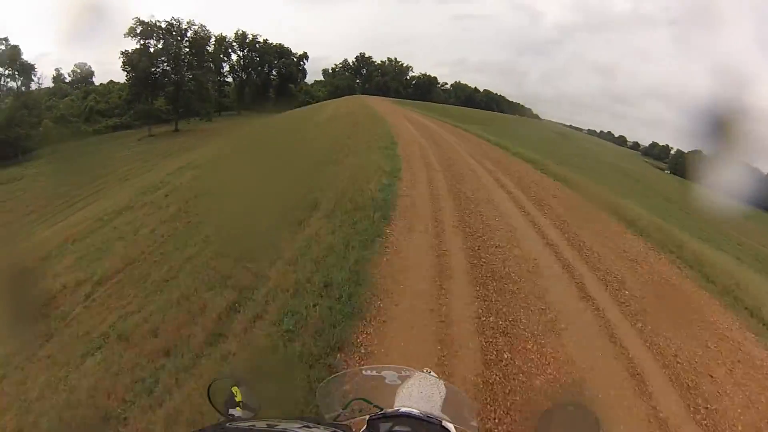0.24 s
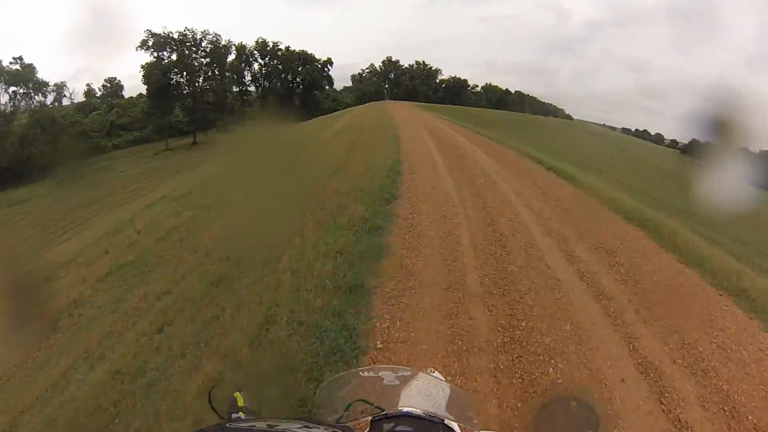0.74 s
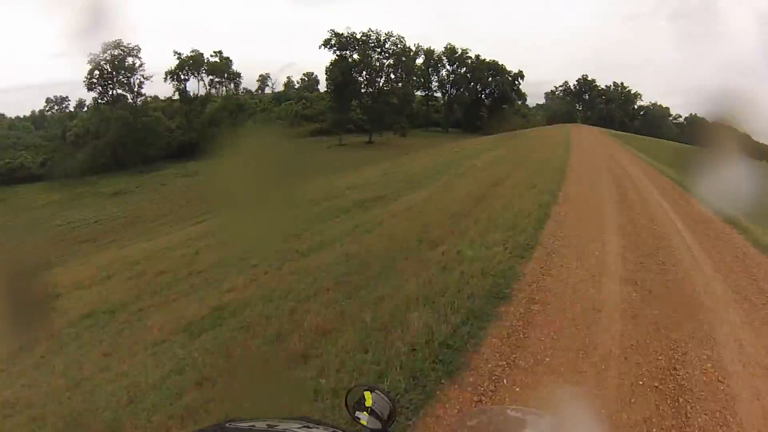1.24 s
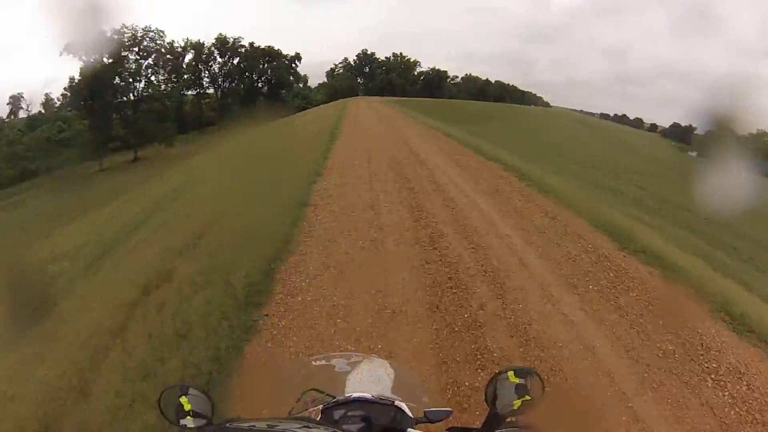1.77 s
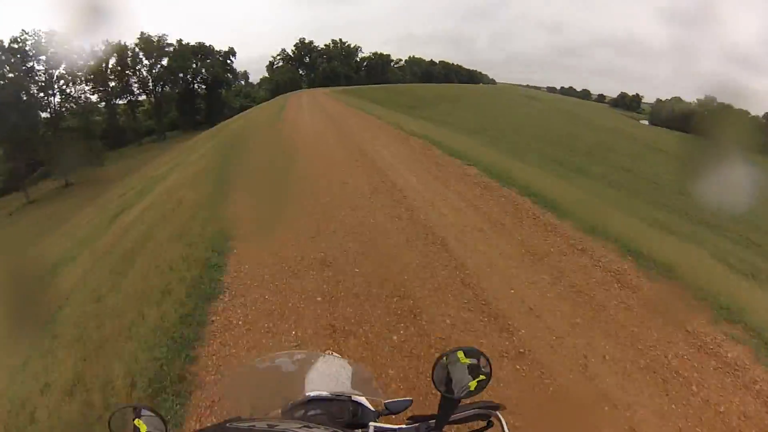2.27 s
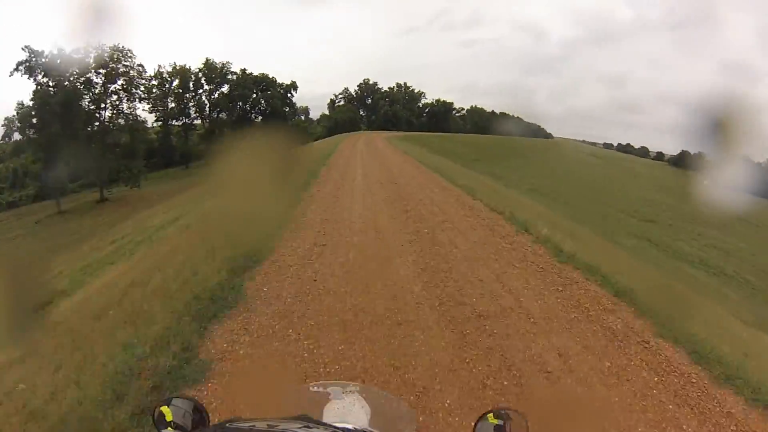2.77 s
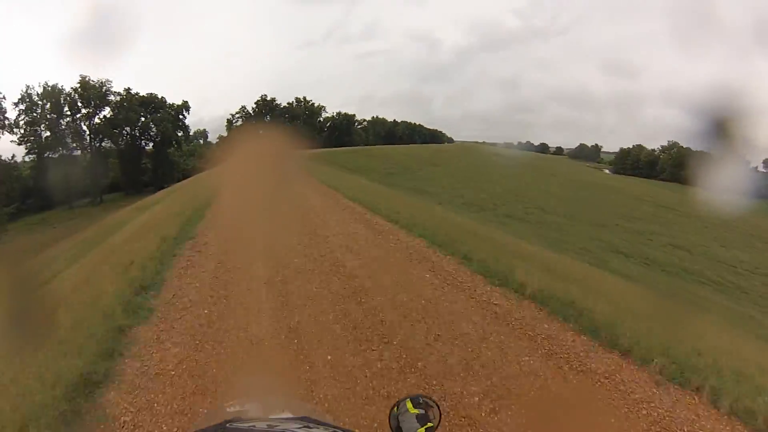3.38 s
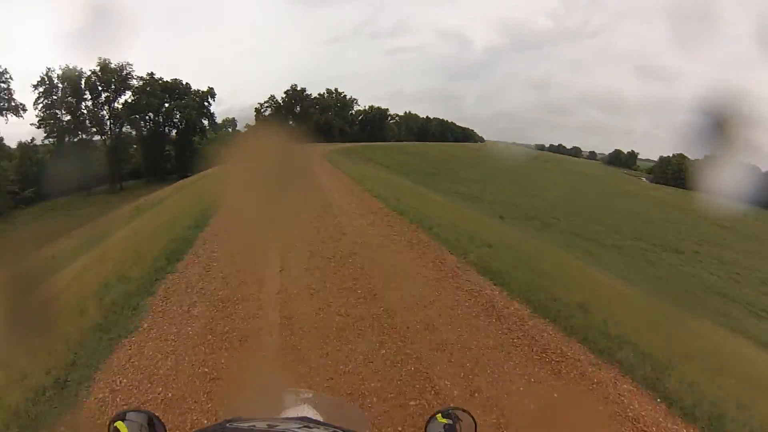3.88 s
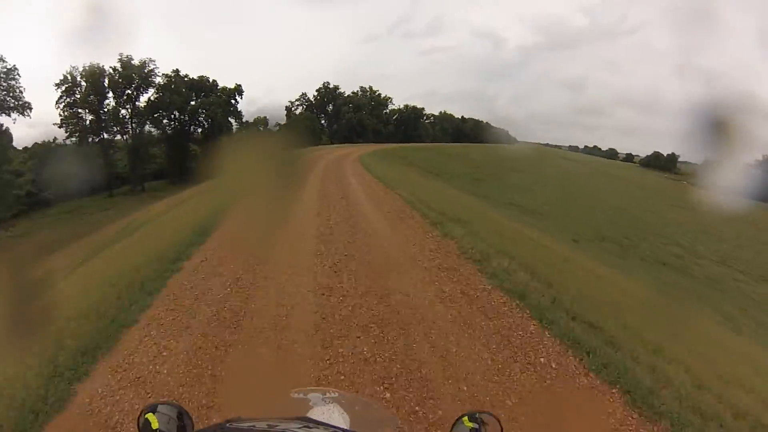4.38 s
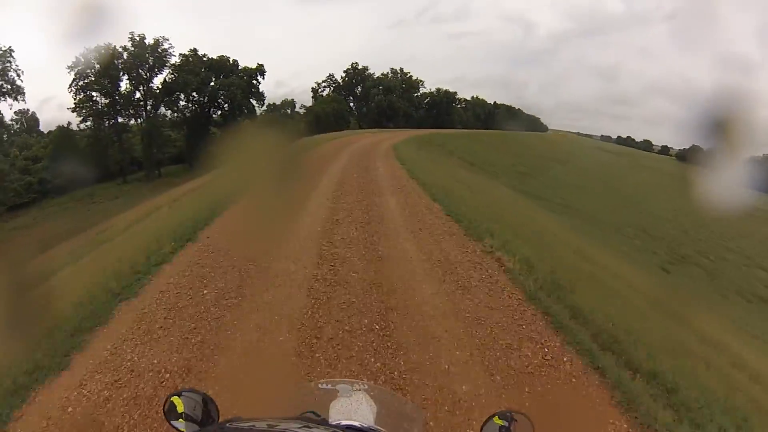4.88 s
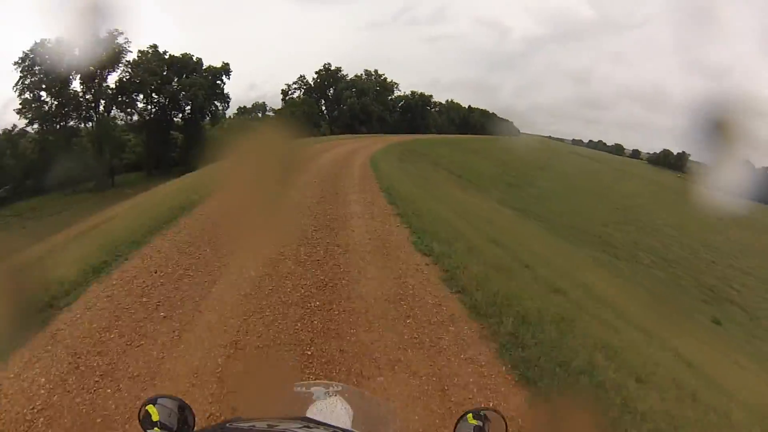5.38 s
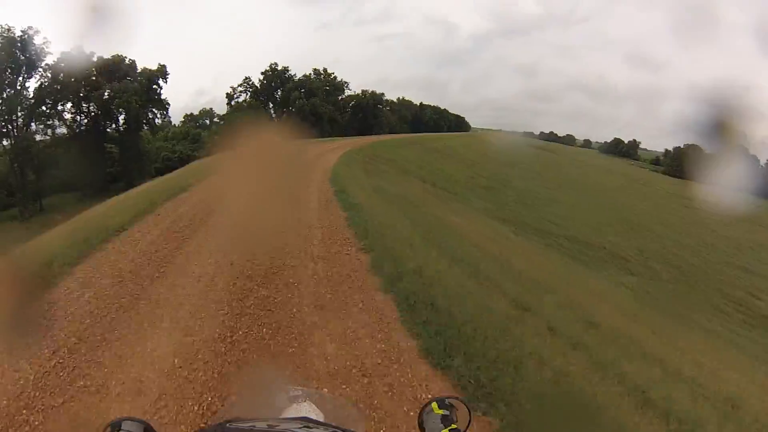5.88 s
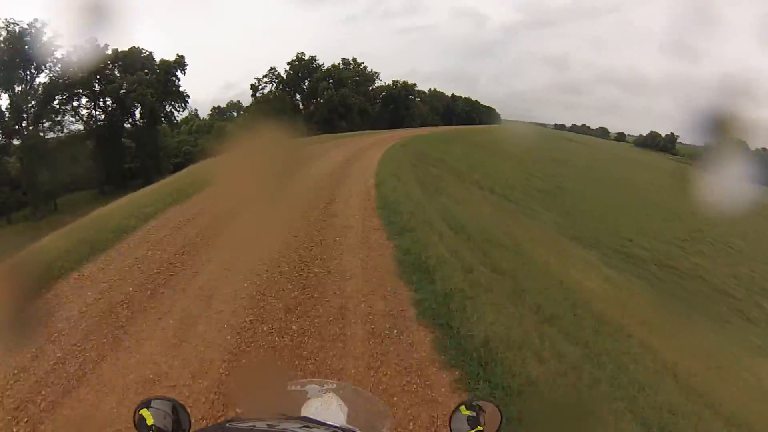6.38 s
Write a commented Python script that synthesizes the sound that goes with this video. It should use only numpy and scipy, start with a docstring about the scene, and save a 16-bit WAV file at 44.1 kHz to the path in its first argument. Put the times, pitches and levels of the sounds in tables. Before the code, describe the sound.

From a helmet-worn microphone inside a sealed plastic case, a single-cylinder motorcycle cruises along an open gravel track. A deep hum swells and fades with the bumps, the exhaust putters dully, and wind buffets, rumbles and hisses with a faint hollow tone. Small grains tick on the casing irregularly, sharpest before one second and again near six.

```python
"""Motorcycle on gravel, from inside a sealed case

A single-cylinder motorcycle cruises over gravel, heard by a helmet camera in a sealed case. The mount booms as
a wandering sine near crank speed; firing pulses and gas noise ring the exhaust pipe. Wind is shaped noise in
three layers: buffeting, rush and hiss, with the air in the case ringing; the road adds a rumble below. Grit
ticks on the plastic as short strikes on its resonances, with faint dust and a puff of fine sand."""
import sys
import numpy as np
from scipy import signal
from scipy.io import wavfile
from scipy.ndimage import uniform_filter1d

SR = 44100
rng = np.random.default_rng(int(sys.argv[2]) if len(sys.argv) > 2 else 0)


def inscribe(sig):
    """Save sig as 16-bit PCM at rate SR to the path in sys.argv[1].

    A 1-D sig is mono; a 2-D sig holds one channel per row.
    Samples are clipped to [-1, 1] before scaling.
    """
    pcm = np.round(np.clip(np.atleast_2d(sig).T, -1, 1) * 32767)
    wavfile.write(sys.argv[1], SR, pcm.astype(np.int16))


N = 292383  # length in samples


def gain_of(db):
    """Turns decibels into amplitude."""
    return 10 ** (np.asarray(db) / 20)


def evened(x):
    """Scales a signal to rms 1."""
    return x / np.sqrt(np.mean(x ** 2) + 1e-20)


def curves(rows):
    """Draws each column after start_s as an automation curve, one value a sample."""
    start_s, *columns = np.transpose(rows)
    t = np.arange(N) / SR
    return [np.interp(t, start_s, column) for column in columns]


def ring(x, modes):
    """Excites a bank of damped resonances; a wider mode dies sooner, and signs alternate along the bank."""
    out = np.zeros(len(x))
    for k, (pitch_hz, width_hz, level_db) in enumerate(modes):
        pole = np.exp((2j * np.pi * pitch_hz - np.pi * width_hz) / SR)
        mode = signal.lfilter([1 - abs(pole)], [1, -pole], x).imag
        out += (-1) ** k * gain_of(level_db) * mode
    return out


def drift(size):
    """Slow random wander of rms 1: noise averaged twice over size samples."""
    once = uniform_filter1d(rng.standard_normal(N), size)
    return evened(uniform_filter1d(once, size))


def air(shape, size, patchy_db, flicker_db):
    """Turbulent air at rms 1: random spectra with drifting patches and a flicker shared by all bins."""
    hz = np.fft.rfftfreq(size, 1 / SR)
    frames = 4 * N // size + 5
    real, imag, patches = rng.standard_normal((frames, len(hz), 3)).T
    patches = uniform_filter1d(patches, size=9, axis=0)
    patches = evened(uniform_filter1d(patches, size=9, axis=1))
    flicker = evened(uniform_filter1d(rng.standard_normal(frames), size=3))

    # the colour is drawn on a log frequency axis
    shape_hz, shape_db = np.transpose(shape)
    colour_db = np.interp(np.log(hz + 1), np.log(shape_hz + 1), shape_db, left=-90, right=-90)[:, None]
    level_db = colour_db + patchy_db * patches + flicker_db * flicker
    spectra = (real + 1j * imag) * gain_of(level_db)
    _, noise = signal.istft(spectra, nperseg=size, noverlap=3 * size // 4)
    return evened(noise[:N])


# How hard the track shakes the mount: start_s [s], level_db [dB rms, before its wavering]
MOUNT_LEVEL = [(0, -45), (.08, -57), (.18, -38), (.27, -60), (.33, -36), (.56, -49), (.68, -40), (.8, -57),
               (.96, -56), (1.02, -41), (1.11, -46.5), (1.16, -43.5), (1.27, -40.5), (1.49, -48.5),
               (1.61, -36.5), (1.8, -47), (2.08, -42), (2.18, -60), (2.3, -45.5), (2.5, -50), (2.87, -46.5),
               (3.27, -48.5), (3.39, -53.5), (3.58, -47), (3.87, -56), (4.03, -41), (4.17, -42.5),
               (4.27, -53.5), (4.4, -54.5), (4.62, -45), (4.9, -40.5), (5.11, -53), (5.17, -43),
               (5.3, -40.5), (5.46, -51), (5.9, -47), (6.15, -44), (6.34, -51), (6.43, -43), (6.63, -55)]
# Pitch of the swinging mount: start_s [s], pitch_hz [Hz, before its wander]
MOUNT_PITCH = [(0, 43.7), (.35, 39.7), (.7, 39.8), (.95, 44), (1.55, 40.35), (2.9, 42.5), (3.6, 43.6),
               (4.0, 41.2), (5.2, 42.4), (5.7, 41), (6.63, 39.5)]
MOUNT_WANDER_HZ = 0.81  # rms


def boom():
    """The camera mount swings near crank speed, swelling and dying as the track shakes it."""
    (level_db,), (pitch_hz,) = curves(MOUNT_LEVEL), curves(MOUNT_PITCH)
    pitch_hz = pitch_hz + MOUNT_WANDER_HZ * drift(size=3000)
    level = gain_of(level_db + 1.75 * drift(size=1500))
    swing = np.sin(2 * np.pi * np.cumsum(pitch_hz) / SR)
    return np.sqrt(2) * level * swing  # sqrt(2) brings the sine to rms 1


# Engine speed and load: start_s [s], firing_rate [firings per s], throttle [0-1]
ENGINE_SPEED = [(0, 21.0, .8), (.4, 20.95, .85), (.6, 21.15, .85), (1.15, 21.25, .8), (1.5, 21.55, .75),
                (1.9, 21.85, .8), (2.1, 22.2, .8), (2.5, 22.45, .85), (2.85, 22.6, .85), (3.05, 22.85, .85),
                (3.45, 23.0, .85), (3.65, 22.3, .6), (4.2, 22.0, .6), (4.6, 21.2, .45), (5.15, 20.75, .65),
                (5.5, 20.5, .7), (6.1, 20.6, .7), (6.63, 20.4, .7)]
# Loudness of the exhaust: start_s [s], level_db [dB, before its wavering]
EXHAUST_LEVEL = [(0, -59), (.41, -58.5), (.7, -63.5), (1.05, -59.5), (1.35, -55.5), (1.6, -63.5),
                 (2.28, -56), (2.7, -63.5), (3.2, -54.5), (3.45, -62.5), (3.6, -55), (3.93, -62),
                 (4.34, -62), (4.51, -57), (4.8, -66.5), (5.05, -58), (5.2, -62.5), (5.48, -60.5),
                 (5.7, -65.5), (5.9, -57.5), (6.63, -62.5)]
# Resonances of the exhaust pipe: pitch_hz [Hz], width_hz [Hz], level_db [dB, relative]
EXHAUST_PIPE = [(163, 8.4, -10), (187.6, 8.8, -7), (234.4, 8.8, 3.5), (293.8, 14.2, 1), (343, 13, -20.5)]
# Clean low orders: order [multiple of the firing rate], level_db [dB peak at full throttle, before wavering]
ENGINE_ORDERS = [(4, -65), (5, -64), (6, -66), (7, -69)]
EXHAUST_WAVER_DB = 1.5  # rms, from one moment to the next


def engine():
    """One uneven blow per firing and the turbulent gas behind it ring the pipe; off throttle mostly the gas."""
    (firing_rate, throttle), (level_db,) = curves(ENGINE_SPEED), curves(EXHAUST_LEVEL)
    firings = np.cumsum(firing_rate * (1 + .004 * drift(size=2000))) / SR  # running count
    blows = np.diff(np.floor(firings), prepend=0) * gain_of(1.8 * drift(size=600))
    # gas noise is strongest right after each firing, over a steady bed
    gas_swell = 0.57 + np.exp(-(firings % 1) / 0.35)
    gas = gas_swell * rng.standard_normal(N)

    # equal-power mix, steered by the throttle
    exhaust = throttle * evened(ring(blows, EXHAUST_PIPE))
    exhaust = exhaust + np.sqrt(1 - throttle ** 2) * evened(ring(gas, EXHAUST_PIPE))

    orders = np.zeros(N)
    for order, order_db in ENGINE_ORDERS:
        order_level = gain_of(order_db + 2.5 * drift(size=3000))
        orders += order_level * np.cos(2 * np.pi * order * firings)
    exhaust_level = gain_of(level_db + EXHAUST_WAVER_DB * drift(size=1600))
    return exhaust_level * exhaust + throttle * orders


# Wind and road layers: start_s [s], rush_level_db [dB], hiss_level_db [dB], rumble_level_db [dB, road rumble]
WIND_LEVELS = [(0, -59.5, -64.5, -58.5), (.48, -59, -63.5, -59), (.87, -58.5, -64.5, -58),
               (1.18, -57.5, -63, -57.5), (1.6, -57.5, -61.5, -57.5), (2.2, -59.5, -64, -55.5),
               (2.53, -59.5, -63.5, -57), (2.9, -55.5, -60, -54.5), (3.16, -57.5, -64, -60.5),
               (3.9, -57, -62.5, -60.5), (4.3, -56.5, -61, -54.5), (4.6, -56.5, -61, -57),
               (5.04, -57, -62, -57.5), (5.42, -57, -61, -56), (5.8, -59, -63.5, -57.5),
               (6.1, -57.5, -63, -58.5), (6.63, -59, -64.5, -58.5)]
# Colour of the buffeting: pitch_hz [Hz], density_db [dB per Hz, relative]
BUFFET_COLOUR = [(5, -17), (12, 5.5), (30, 0), (48, -4.5), (57, -3.5), (66, -12), (80, -52)]
BUFFET_DB = -51.5  # rms
# Colour of the rumble: pitch_hz [Hz], density_db [dB per Hz, relative]
RUMBLE_COLOUR = [(50, -26), (66, 4.5), (120, -0.5), (200, 1), (330, -5.5), (450, -22)]
# Colour of the rush: pitch_hz [Hz], density_db [dB per Hz, relative]
RUSH_COLOUR = [(190, -36), (330, 1), (411, -9.5), (462, -7.5), (766, -8), (961, -7), (1150, -1), (1370, 1),
               (1700, -11), (1900, -10), (2470, -25.5), (4180, -120)]
# Resonance of the air in the case: pitch_hz [Hz], width_hz [Hz], level_db [dB against the rush]
CASE_AIR = [(1299, 45, -11)]
# Colour of the hiss: pitch_hz [Hz], density_db [dB per Hz, relative]
HISS_COLOUR = [(880, -35), (1500, -2), (1820, -7), (2100, -1), (2380, -3.5), (2850, -11.5), (3370, -15),
               (3730, -11.5), (4320, -19.5), (4850, -16), (5900, -21.5), (6590, -16.5), (7290, -24.5),
               (12600, -36.5), (12950, -60)]


def wind():
    """Turbulence buffets below, rushes and rings the air in the case, and hisses on top; the road rumbles
    underneath."""
    rush_db, hiss_db, rumble_db = curves(WIND_LEVELS)
    buffet = gain_of(BUFFET_DB) * air(BUFFET_COLOUR, size=8192, patchy_db=2.5, flicker_db=1.5)
    rumble = gain_of(rumble_db) * air(RUMBLE_COLOUR, size=4096, patchy_db=0.55, flicker_db=0.4)

    # two passes sharpen the hollow tone
    hollow = ring(ring(rng.standard_normal(N), CASE_AIR), CASE_AIR)
    hollow = gain_of(CASE_AIR[0][2]) * evened(hollow)
    rush = air(RUSH_COLOUR, size=1024, patchy_db=0.99, flicker_db=0.5)
    rush = gain_of(rush_db) * (rush + hollow)
    hiss = gain_of(hiss_db) * air(HISS_COLOUR, size=512, patchy_db=1.0, flicker_db=0.74)
    return buffet + rumble + rush + hiss


# Ringing of the plastic case, four knock modes, six tick, four sizzle:
# pitch_hz [Hz], width_hz [Hz], level_db [dB, relative]
CASE_MODES = [(1170, 170, -4), (1570, 240, 5), (1856, 460, 2), (2350, 370, 7), (2974, 235, 5.5),
              (3130, 590, 4), (3746, 200, 4), (4586, 590, 0), (5950, 870, 1.5), (6810, 360, 0),
              (8100, 1200, -3.5), (10500, 3900, -5), (10900, 1300, 0), (13070, 610, -7.5)]
CONTACT_S = 0.0023  # how long a grain rattles on the plastic


def tick(levels_db, spots_hz, rattle):
    """A grain strikes and rattles on the case; its spot favours the modes near its own pitches."""
    t = np.arange(len(rattle)) / SR
    strike = t == 0
    force = strike + .11 * rattle * np.exp(-(t / CONTACT_S) ** 2)
    banks = CASE_MODES[4:10], CASE_MODES[:4], CASE_MODES[10:]  # tick, knock, sizzle
    out = np.zeros(len(t))
    for modes, level_db, spot_hz in zip(banks, levels_db, spots_hz):
        # each octave away from the spot costs a mode 13 dB
        favoured = [(hz, width, db - 13 * abs(np.log2(hz / spot_hz))) for hz, width, db in modes]
        part = ring(force, favoured)
        part *= 1 - np.exp(-t * spot_hz / 1.2)  # the lows take longer to build up in the wall
        out += gain_of(level_db) * part / abs(part).max()
    return out


# Larger grains, levels are peaks inside the wall: start_s [s], tick_level_db [dB], tick_pitch_hz [Hz],
# knock_level_db [dB], knock_pitch_hz [Hz], sizzle_level_db [dB], sizzle_pitch_hz [Hz]
GRAINS = [(0.1077, -59, 3700, -50, 1940, -62, 7650), (0.3406, -42.5, 3340, -34.5, 2310, -52, 10600),
          (0.5804, -37, 3700, -36, 1800, -46, 8050), (0.8242, -29, 4540, -30, 2300, -39.5, 8060),
          (1.696, -51.5, 3540, -46, 2370, -55, 11270), (1.7921, -49.5, 3170, -46.5, 2070, -51.5, 10100),
          (1.9692, -49, 3180, -40, 1530, -51.5, 12100), (2.901, -59, 3690, -43, 1519, -57, 7530),
          (3.1587, -57, 3066, -48.5, 2080, -80, 7520), (3.5815, -52, 3760, -48, 2293, -60, 10700),
          (3.6018, -39.5, 3480, -49, 2480, -48.5, 10100), (3.822, -65, 4960, -55, 2296, -60, 11000),
          (3.8694, -54, 3060, -43.5, 1630, -80, 7700), (3.9302, -45, 5570, -58, 1980, -76, 7720),
          (3.9682, -48, 3920, -46, 1520, -61, 11000), (4.0476, -53, 3205, -48, 1603, -52, 10500),
          (4.0931, -46.5, 3220, -64, 1630, -64, 8890), (4.114, -53, 3355, -49, 2053, -53, 9000),
          (4.3934, -49.5, 3450, -46, 2115, -55, 11350), (4.5572, -39, 3430, -40, 2270, -48.5, 8190),
          (5.611, -47.5, 6700, -66, 1756, -61, 7520), (5.849, -56, 3560, -64, 1608, -55, 9400),
          (5.9335, -54, 3595, -52, 2220, -54, 7840), (6.0836, -38.5, 4500, -26.5, 1948, -48.5, 9460),
          (6.1493, -50, 6350, -59, 1570, -62, 8210), (6.5286, -55.5, 3672, -62, 1570, -63, 7650)]
DUST_PER_S, DUST_DB = 9, -97  # average landings per s, rms level before the wall


def grit():
    """Larger grains and faint random dust strike the case; its wall passes neither deep lows nor the top."""
    grains = np.zeros(N + 600)
    rattles = rng.standard_normal((len(GRAINS), 500))
    for (start_s, *settings), rattle in zip(GRAINS, rattles):
        start = round(start_s * SR)
        grains[start:start + 500] += tick(settings[0::2], settings[1::2], rattle)

    dust_level = gain_of(1.8 * np.minimum(rng.exponential(1, N), 3))
    landings = dust_level * (rng.random(N) < DUST_PER_S / SR)
    dust = gain_of(DUST_DB) * evened(ring(landings, CASE_MODES[5:12]))
    wall = signal.butter(3, [700, 13600], "bandpass", fs=SR, output="sos")
    return signal.sosfilt(wall, grains[:N] + dust)


# Puff of fine sand on the case: centre_s [s], level_db [dB], half_length_s [s]
SAND_PUFFS = [(2.442, -63, 0.011)]


def spray():
    """Sand too fine for single ticks: a short swell of noise in the upper modes of the case."""
    t = np.arange(N) / SR
    swell = np.zeros(N)
    for centre_s, level_db, half_length_s in SAND_PUFFS:
        swell += gain_of(level_db) * np.exp(-((t - centre_s) / half_length_s) ** 4)
    return swell * evened(ring(rng.standard_normal(N), CASE_MODES[3:11]))


def scene():
    """All sources sum at the one microphone."""
    mix = boom() + engine() + wind() + grit() + spray()
    return mix[None]


EDGE_HZ = 15300  # upper band edge


def record(dry):
    """The recorder's band limit: a steep low-pass, centred so that it adds no delay."""
    lowpass = signal.firwin(511, EDGE_HZ, window=("kaiser", 9), fs=SR)
    return signal.oaconvolve(dry, lowpass[None], "same")


dry = scene()
out = record(dry)
inscribe(out)
```